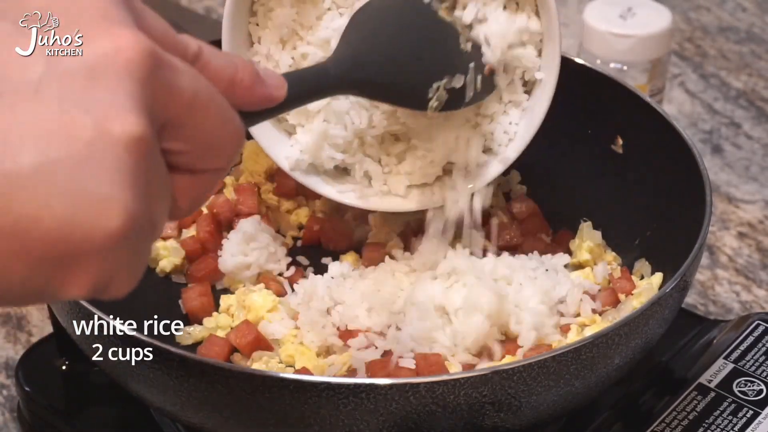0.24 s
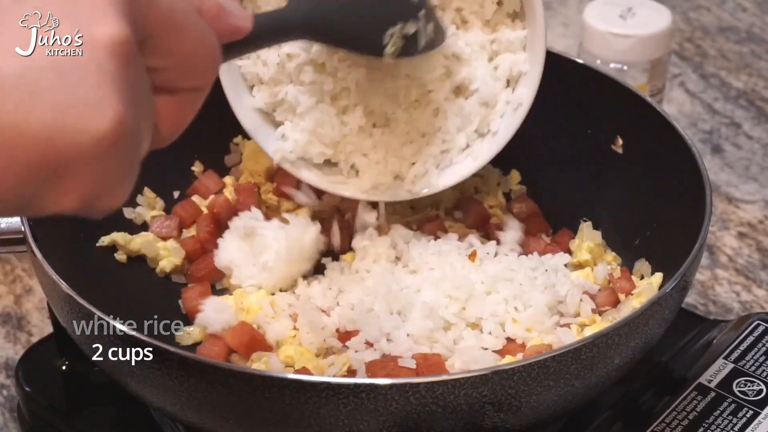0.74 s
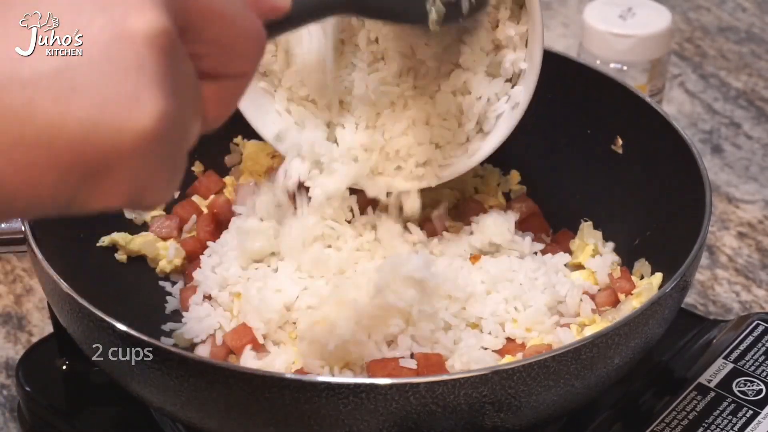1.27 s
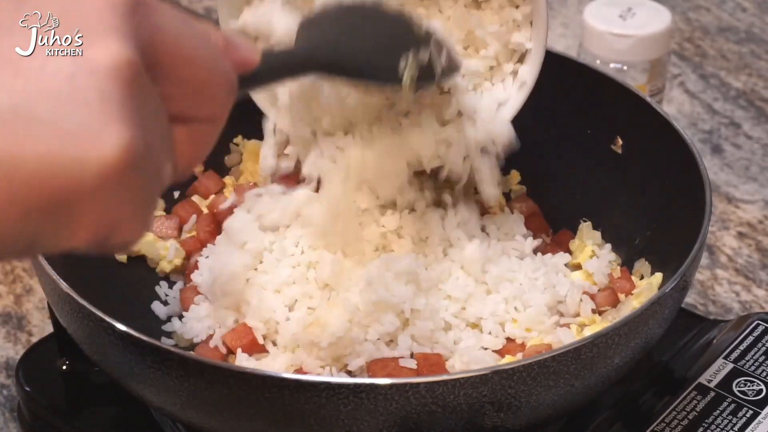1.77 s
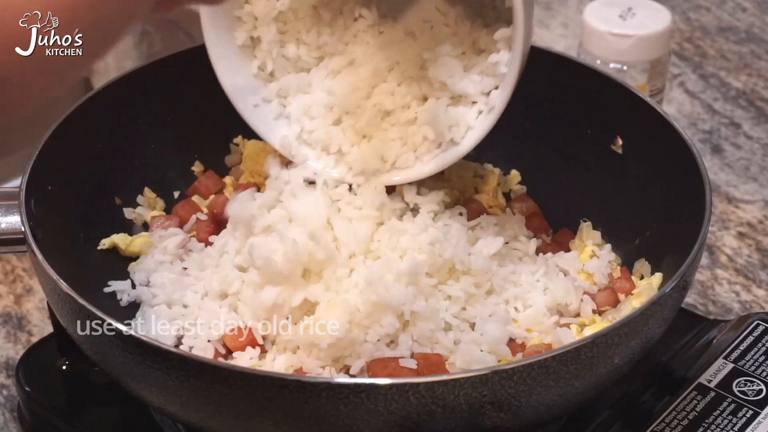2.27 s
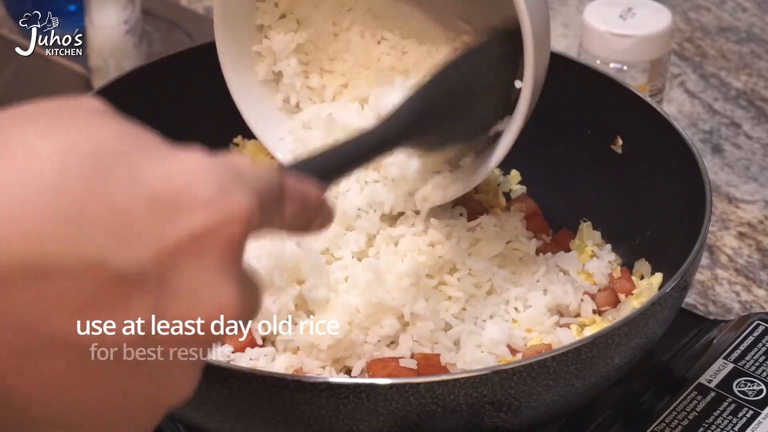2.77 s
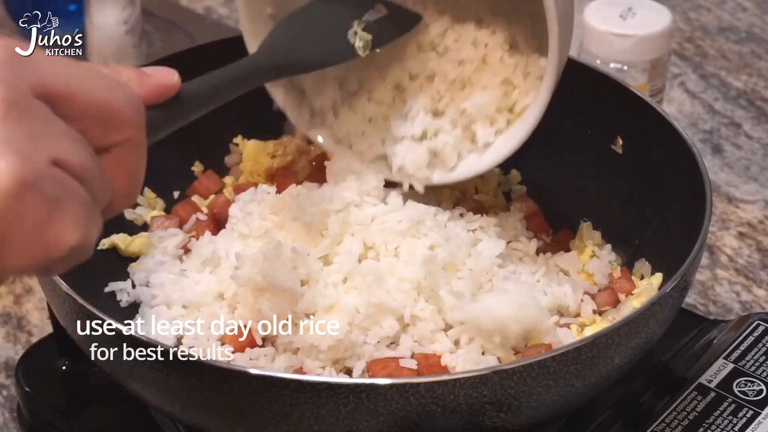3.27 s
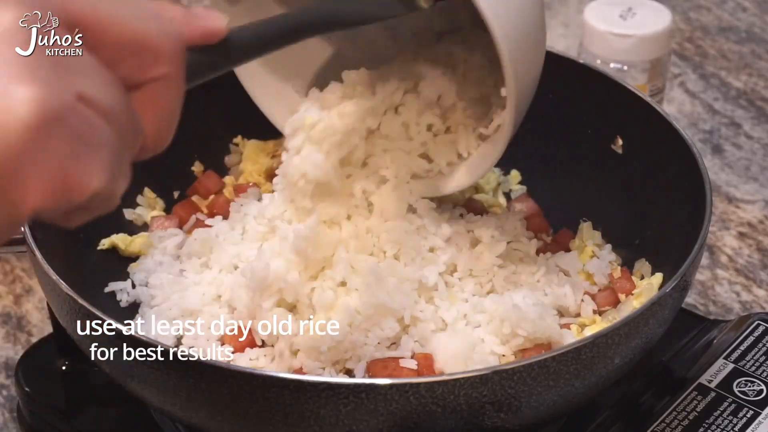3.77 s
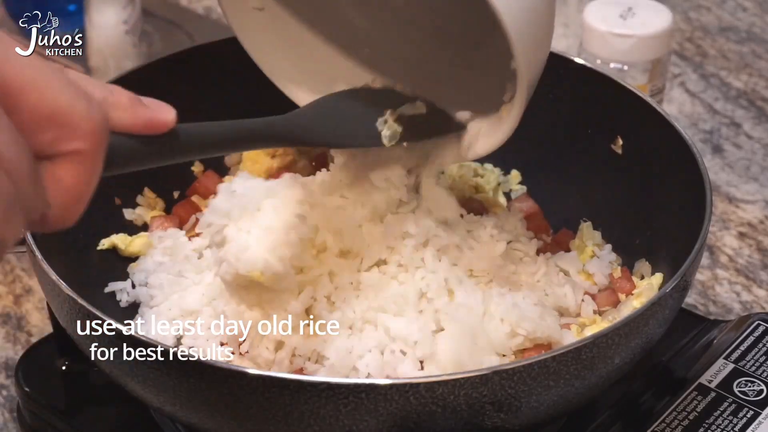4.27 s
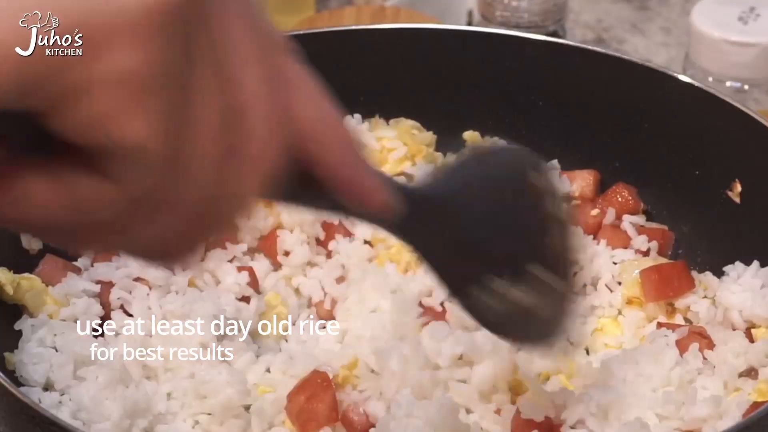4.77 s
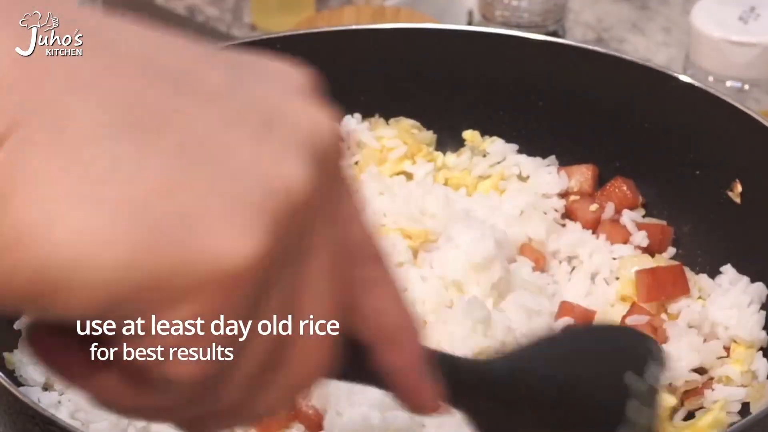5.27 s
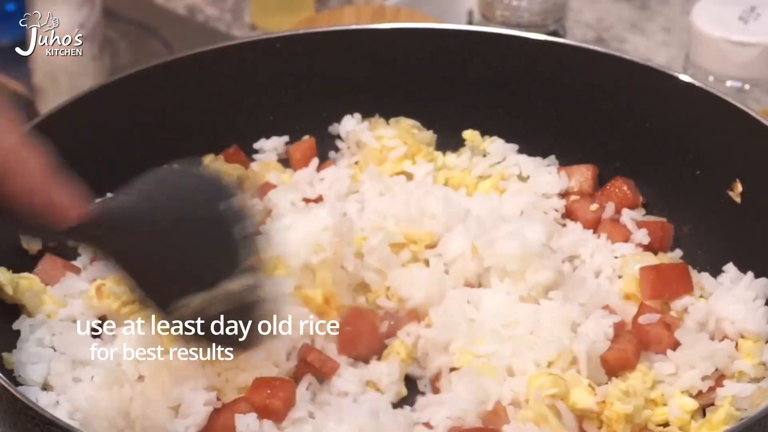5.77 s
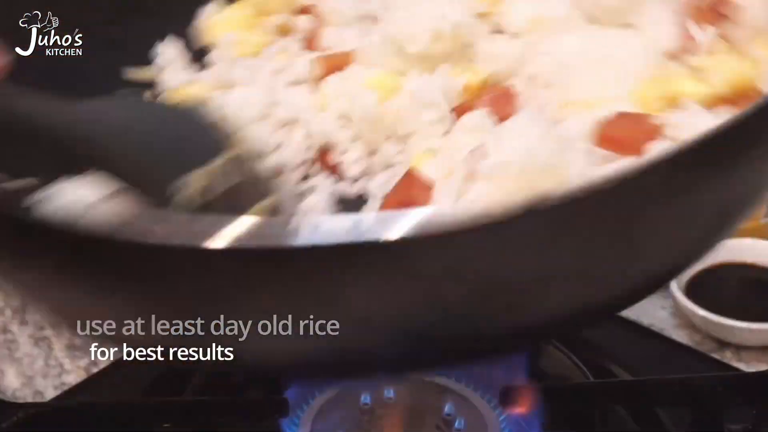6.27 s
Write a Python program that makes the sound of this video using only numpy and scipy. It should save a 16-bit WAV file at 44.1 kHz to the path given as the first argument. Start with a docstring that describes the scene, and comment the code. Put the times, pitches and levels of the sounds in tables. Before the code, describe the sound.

Close frying crackle with sharp spits and soft pats of falling rice, growing louder as a spatula turns the food and knocks the wok.

```python
"""A home kitchen, one microphone close to a hot nonstick wok of ham and egg on a gas ring.
Cooked rice is pushed in from a bowl and lands in soft clumps. Steam bubbles burst in the fat as a
sizzle, and drops explode in sharp spits. From 4.64 s a plastic spatula turns the food over: the sizzle
swells with each stroke and the blade knocks on the wok. Underneath, the flame flutters and the wok
booms when nudged on its ring; tiles and cupboards add a short tail."""
import sys
import numpy as np
from scipy import signal
from scipy.fft import rfft, irfft, next_fast_len
from scipy.io import wavfile
from scipy.ndimage import uniform_filter1d

SR = 44100
rng = np.random.default_rng(int(sys.argv[2]) if len(sys.argv) > 2 else 0)


def transcribe(u):
    """Save the signal u as a 16-bit wav file named by the first command-line argument.

    u: samples, shape (n,) or (channels, n), limited to [-1, 1]; the rate is SR.
    q: integer samples, one column per channel.
    """
    v = np.clip(np.atleast_2d(u).T, -1, 1)
    q = np.round(v * 32767).astype(np.int16)
    wavfile.write(sys.argv[1], SR, q)


N = 287532
TIME = np.arange(N) / SR
STIR_START_S = 4.64

def from_db(db):
    return 10 ** (np.asarray(db) / 20)

def unit_rms(x):
    return x / np.sqrt(np.mean(x ** 2) + 1e-20)

def butterworth(x, hz, kind="band", order=2):
    return signal.lfilter(*signal.butter(order, hz, kind, fs=SR), x)

def resonate(x, hz, width_hz):
    """A resonance with gain 1 at its peak."""
    return signal.lfilter(*signal.iirpeak(hz, hz / min(width_hz, SR / 4), fs=SR), x + 1e-18)

def colour(x, spectrum):
    """Shapes a signal by a spectrum drawn on a log-frequency axis; rms 1."""
    size = next_fast_len(N)
    hz, db = np.transpose(spectrum)
    bin_hz = np.arange(size // 2 + 1) * SR / size
    gain = from_db(np.interp(np.log(bin_hz + 1e-9), np.log(hz), db))
    return unit_rms(irfft(rfft(x, size) * gain, size)[:N])

def swell(start_s, length_s, attack_s, release_s):
    """An envelope that rises, holds until its length is over and dies away."""
    age = TIME - start_s
    return np.clip(age / attack_s, 0, 1) * np.exp(-np.maximum(age - length_s, 0) / release_s)

def grains(per_s, spread_db, max_spreads):
    """Clicks at random moments, many small and a few large."""
    sizes = from_db(spread_db * np.minimum(rng.exponential(1, N), max_spreads))
    return sizes * rng.choice([-1, 1], N) * (rng.random(N) < per_s / SR)

def contact(start_s, fade_s):
    """Rough contact force that starts at once and dies away."""
    age = np.maximum(TIME - start_s, 0)
    return (TIME > start_s) * np.exp(-np.minimum(age / fade_s, 40)) * rng.standard_normal(N)

# Tone of the frying fat, close up: frequency_hz, level_db
SIZZLE_SPECTRUM = [(300, -10.5), (600, -10), (1000, 1), (1700, -4.5), (2400, 3), (3300, -0.5), (5000, -1),
                   (6500, 1.5), (9000, 0.5), (10700, -6), (12000, -4.5), (16000, -6)]
# Tone of droplets on bare metal: frequency_hz, level_db
TICK_SPECTRUM = [(500, -24), (2500, -5), (8000, 7), (11000, -3), (16000, 5)]

def sizzle(sizzle_db, stirring):
    """Crackle over a fine hiss; turning the food wets the hot metal and multiplies the bursts."""
    bursts = steam_bursts(per_s=1500 + 3000 * stirring, spread_db=4, sharpness=1.37, max_spreads=3.8)
    crackle = colour(bursts, SIZZLE_SPECTRUM)
    hiss = colour(rng.standard_normal(N), SIZZLE_SPECTRUM)
    # droplets on bare metal go off as lone bright ticks, which the stirred food partly smothers
    droplets = steam_bursts(per_s=70, spread_db=5.5, sharpness=2, max_spreads=2.2)
    ticks = from_db(-9 - 3 * stirring) * colour(droplets, TICK_SPECTRUM)
    frying = (from_db(-1.5) * crackle + from_db(-2) * hiss) * flares()
    return from_db(sizzle_db - 2 - 2.57 * stirring) * (frying + ticks)

def steam_bursts(per_s, spread_db, sharpness, max_spreads):
    """Tiny steam bubbles burst in the fat, each a cycle or two at one of 14 pitches."""
    pitches_hz = np.geomspace(1300, 14000, 14)
    clicks = grains(per_s, spread_db, max_spreads)
    choice = rng.integers(0, len(pitches_hz), N)
    return sum(resonate(clicks * (choice == k), hz, hz / sharpness) for k, hz in enumerate(pitches_hz))

def flares(per_s=52, fade_s=0.0034, depth=2.25):
    """Moisture reaching the metal lifts the sizzle at once; it dies back as the water boils off."""
    wetting = (rng.random(N) < per_s / SR) * rng.uniform(.3, 1, N)
    steam = signal.lfilter([1], [1, -np.exp(-1 / (fade_s * SR))], wetting + 1e-18)
    return unit_rms(np.sqrt(1 + depth * steam))

# Sizzle of the undisturbed food: time_s, relative_db
SIMMER_LEVELS = [(0.0, -49.5), (0.31, -47), (0.51, -51.5), (1.11, -48.5), (1.23, -48.5), (2.38, -47),
                 (3.04, -49.5), (4.43, -48.5), (4.6, -48)]
# Spatula strokes spreading food over the hot metal: start_s, length_s, relative_db
SPATULA_STROKES = [(4.644, 0.16, -39), (4.821, 0.13, -36), (5.042, 0.063, -37.5), (5.188, .11, -37),
                   (5.445, 0.11, -36), (5.727, 0.16, -37.5), (5.975, 0.037, -39), (6.128, 0.06, -39),
                   (6.416, .07, -41)]

def frying_level(stirring, between_strokes_db=-40.5, toss_s=6.285, toss_width_s=0.07):
    """Relative sizzle in dB: steady frying, a rise for each wet clump and each stroke, a dip at a toss."""
    simmer_db = np.interp(TIME, *np.transpose(SIMMER_LEVELS)) + 1.5
    power = from_db(np.where(stirring, between_strokes_db, simmer_db)) ** 2
    for start_s, db in RICE_CLUMPS:
        power += (from_db(db - 4.5) * swell(start_s, 0.012, attack_s=0.012, release_s=0.049)) ** 2
    for start_s, length_s, db in SPATULA_STROKES:
        power += (from_db(db) * swell(start_s, length_s, attack_s=0.038, release_s=0.12)) ** 2
    dip_db = 5 * np.exp(-((TIME - toss_s) / toss_width_s) ** 2)  # tossed food leaves the metal
    return 10 * np.log10(power) - dip_db

# The loudest snaps, of fat and of the spatula's edge: start_s, relative_db, pitch_hz, length_cycles
LOUD_SPITS = [(0.14, -13, 2530, 2), (0.273, -13.5, 2500, 0.77), (0.364, -16.5, 2500, 3.5),
              (0.6914, -13.5, 2950, 1.2), (1.0425, -14.5, 5240, 1), (1.3012, -17.5, 1250, 1.5),
              (1.609, -14.5, 2280, 1.3), (1.693, -12.5, 7460, 3.1), (1.8726, -23, 1290, .7),
              (1.942, -11, 2500, 2.6), (2.0738, -12, 5600, .8), (2.2433, -14.5, 3840, 1.5),
              (2.4487, -15.5, 3700, 1.8), (2.4893, -17.5, 1900, 0.69), (2.607, -12.5, 7500, 2.7),
              (2.8075, -15, 2620, 5.3), (2.9329, -19.5, 4700, 1.4), (3.0162, -15.5, 2390, 1.7),
              (3.2564, -13, 1910, 1.5), (3.3422, -17.5, 7440, 2.5), (3.391, -9.5, 2700, 0.55),
              (3.4829, -10.5, 3620, 0.63), (3.643, -16, 2500, 1.4), (3.9097, -18, 6600, 2.1),
              (4.0952, -17.5, 3360, 1.9), (4.1401, -14.5, 2350, 8.7), (4.2226, -15.5, 8750, 1.9),
              (4.4134, -8.5, 2950, 4), (4.4828, -15, 2300, 1.7), (4.5995, -13, 2240, .6),
              (4.6794, -11, 2500, 3.2), (4.7976, -11.5, 2900, 1.9), (4.8787, -10, 3000, 3),
              (5.0687, -11.5, 5500, 3), (5.1147, -9.5, 5540, 3), (5.2514, -9.5, 3000, 3.5),
              (5.8485, -10.5, 2500, 7.8), (5.8943, 1, 2390, 1.3), (6.0183, -11.5, 2800, 2.8),
              (6.2116, -13.5, 2600, 4.6)]

def spits(drops, gain_db=-2.2, fizz_s=0.0029, size=3072):
    """A drop explodes with one snap, spatters for a few cycles and fizzes out; its size sets the pitch."""
    out, t = np.zeros(N + size), np.arange(size) / SR
    for start_s, db, hz, cycles in drops:
        noise = rng.standard_normal(size)
        spatter = noise * np.exp(-t * hz / (1.3 * max(cycles - .6, .1))) * (t > .5 / hz)
        burst = (t == 0) + np.sqrt(hz / SR) * spatter
        snap = butterworth(resonate(burst, hz, hz), [hz / 5, min(hz * 2.4, 16000)])
        ring = resonate(snap, hz, hz / 13)  # the opened bubble
        crack = butterworth(burst, [1.3 * hz, 16000])  # the tearing film
        fizz = butterworth(noise * np.exp(-t / fizz_s), [1500, 9000])  # spray falls back on hot metal
        at = int(start_s * SR)
        for part, part_db in [(snap, 0), (ring, -10), (crack, -10.5), (fizz, -6)]:
            out[at:at + size] += from_db(db + gain_db + part_db) * part / np.linalg.norm(part)
    return out[:N]

def small_drops(swing_db, per_s=9, middle_hz=6140, spread_octaves=0.72):
    """Smaller drops spit at random, louder as the sizzle grows; rows like those of LOUD_SPITS."""
    when, strength, pitch, length = rng.uniform(-1, 1, (int(per_s * N / SR), 4)).T
    start_s = (when + 1) / 2 * TIME[-1]
    db = -18.5 + 2 * strength + 0.53 * np.interp(start_s, TIME, swing_db)
    hz = middle_hz * 2 ** (spread_octaves * pitch)
    cycles = 2.3 * 2 ** length
    return list(zip(start_s, db, hz, cycles))

# Rice landing in the wok: start_s, relative_db
RICE_CLUMPS = [(0.14, -50), (0.438, -43.5), (0.546, -46.5), (0.669, -45.5), (1.042, -42.5), (1.3, -41.5),
               (1.808, -44.5), (1.871, -39), (1.959, -47), (2.24, -41), (2.806, -40), (2.93, -41),
               (3.255, -46), (3.339, -42.5), (3.64, -49), (5.114, -37), (6.175, -44), (6.33, -43),
               (6.367, -47)]

def rice_clumps():
    """Lumps of rice land with a dull pat that sets the hollow of the wok ringing."""
    force = sum(from_db(db) * contact(start_s, fade_s=0.0063) for start_s, db in RICE_CLUMPS)
    pat = butterworth(force, [616, 1500])
    return from_db(12.5) * pat + from_db(2.5) * hollow_ring(force)

# The blade meeting the wok: start_s, relative_db, scrape_s, cutoff_hz, pitch_ratio
SPATULA_BLOWS = [(5.539, -28.5, 0.0045, 814, 1.02), (5.777, -29, 0.021, 2000, .975),
                 (5.846, -30.5, 0.028, 2700, .865), (5.899, -36.5, 0.021, 2400, 1.0)]
# Modes of the struck wok: pitch_hz, relative_db, t60_s
METAL_MODES = [(260.5, -14, 0.17), (335, -12.5, 0.097), (466, -9.5, 0.049), (552, -1.5, 0.028),
               (663, -22, 0.097), (802, -10, 0.3), (950, -18, 0.046), (1186, -5, 0.13), (1192, 1.5, 0.054),
               (1760, -10, 0.15), (1800, -24, .08), (2200, -10, 0.06), (2890, -4.5, 0.044)]

def spatula_knocks(ring_db=33, scrape_db=4):
    """The plastic blade hits and skids; its pressure and the food damp and shift the wok's modes."""
    out = np.zeros(N)
    for start_s, db, scrape_s, cutoff_hz, pitch_ratio in SPATULA_BLOWS:
        push = contact(start_s, scrape_s)
        push[int(start_s * SR)] += 10  # the hit before the skid
        force = from_db(db) * butterworth(push, cutoff_hz, "low")
        for k, (hz, mode_db, t60_s) in enumerate(METAL_MODES):
            mode = resonate(force, hz * pitch_ratio, width_hz=np.log(1000) / (np.pi * t60_s))
            out += (-1) ** k * from_db(mode_db + ring_db) * np.sqrt(t60_s) * mode
        out += from_db(scrape_db) * butterworth(force, 230, "high")
    return out

def spatula_squeak(at_s=.566, pitch_hz=5660, width_s=.006, level_db=-44):
    """The spatula sticks and slips once on the bowl."""
    envelope = np.exp(-((TIME - at_s) / width_s) ** 2)
    return from_db(level_db) * envelope * np.sin(2 * np.pi * pitch_hz * TIME)

# Resonances of the air in the bowl of the wok: pitch_hz, width_hz, relative_db
HOLLOW_MODES = [(580, 100, 2), (1145, 160, 0), (790, 200, -7), (1500, 300, -10)]

def hollow_ring(force):
    """The air in the wok rings in answer to a force."""
    return sum(from_db(db) * resonate(force, hz, width_hz) for hz, width_hz, db in HOLLOW_MODES)

def grain_patter(swing_db):
    """Grains shifting and frying ring the hollow, following part of the sizzle's swing."""
    patter = grains(per_s=1500, spread_db=8.5, max_spreads=3.75)
    return from_db(-60 + 0.65 * swing_db) * unit_rms(hollow_ring(patter))

def rice_slide():
    """Loose grains rub down the wall and keep the lowest resonance of the hollow ringing."""
    hz, width_hz, _ = HOLLOW_MODES[0]
    rubbing = grains(per_s=1500, spread_db=3, max_spreads=3)
    ringing = resonate(resonate(rubbing, hz, width_hz), hz, 2 * width_hz)
    envelope = swell(start_s=.545, length_s=.2, attack_s=0.012, release_s=.05)
    return from_db(-59.5) * envelope * unit_rms(ringing)

# Tone of the flame under the wok: frequency_hz, level_db
FLAME_SPECTRUM = [(20, -2.5), (32, 7.5), (48, -5), (68, -3), (100, -4), (150, -10), (300, -52), (600, -57)]
# The wok nudged on its ring: start_s, length_s, level_db
WOK_NUDGES = [(0.0, 0.27, -54.5), (1.057, 0.19, -53.5), (1.842, 0.38, -59), (4.61, .07, -50),
              (4.875, .09, -51), (5.152, 0.06, -47), (5.33, 0.48, -53.5), (5.822, 0.055, -42),
              (6.2, .2, -58.5)]

def flame_rumble(flame_db=-62.5, boom_hz=67.3):
    """Low flutter of the flame; each nudge swells it and brings out the boom under the wok."""
    power = from_db(flame_db) ** 2
    for start_s, length_s, db in WOK_NUDGES:
        power += (from_db(db) * swell(start_s, length_s, attack_s=.025, release_s=0.13)) ** 2
    level_db = 10 * np.log10(power)
    boom = unit_rms(resonate(rng.standard_normal(N), boom_hz, width_hz=3.4))
    boom_db = -2 + .3 * (level_db - level_db.mean())
    rumble = colour(rng.standard_normal(N), FLAME_SPECTRUM) + from_db(boom_db) * boom
    running_rms = np.sqrt(uniform_filter1d(rumble ** 2, SR // 6))
    return from_db(level_db) * rumble / running_rms

def kitchen_reverb(direct, t60_s=.28, delay_s=0.0027, dull_hz=7650):
    """A diffuse tail from tiles and cupboards, duller than the direct sound."""
    t = TIME[:SR // 2]
    envelope = from_db(-60 * t / t60_s) * np.clip(t / delay_s - 1, 0, 1)
    tail = rng.standard_normal(len(t)) * envelope
    tail = butterworth(tail / np.linalg.norm(tail), dull_hz, "low", order=1)
    return from_db(-11) * signal.fftconvolve(direct, tail)[:N]

# Room tone around the microphone: frequency_hz, level_db
ROOM_SPECTRUM = [(20, -7), (60, -5), (125, 0), (200, -1), (280, -2.5), (420, -13.5), (800, -10),
                 (2000, -6.5), (8000, -75)]

def room_tone():
    """The kitchen's air, a faint, steady, low hush."""
    return from_db(-58.5) * colour(rng.standard_normal(N), ROOM_SPECTRUM)

def scene():
    """The wok close to the microphone, the kitchen around it; mono."""
    stirring = TIME > STIR_START_S
    sizzle_db = frying_level(stirring)
    swing_db = sizzle_db - sizzle_db.mean()
    wok = sizzle(sizzle_db, stirring) + grain_patter(swing_db)
    wok += rice_clumps() + spatula_knocks() + rice_slide() + spatula_squeak()
    background = room_tone() + flame_rumble()
    wok += spits(LOUD_SPITS + small_drops(swing_db))
    return (wok + kitchen_reverb(wok) + background)[None]

def record(dry):
    """The treble is cut steeply above 15950 Hz."""
    return signal.sosfilt(signal.ellip(12, .1, 70, 15950, fs=SR, output="sos"), dry)

dry = scene()
out = record(dry)
transcribe(out)
```